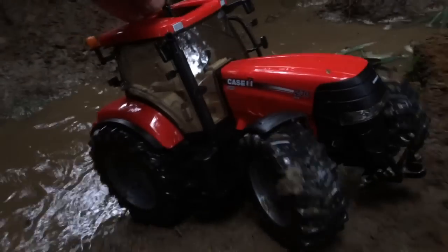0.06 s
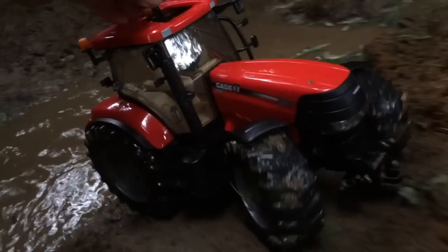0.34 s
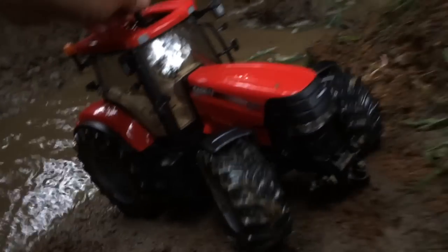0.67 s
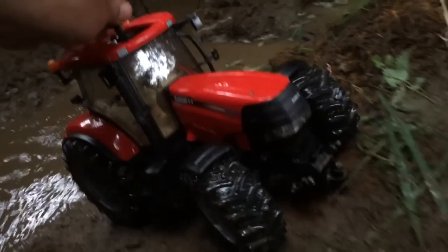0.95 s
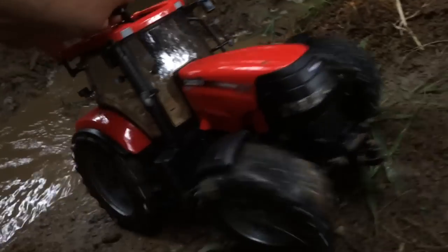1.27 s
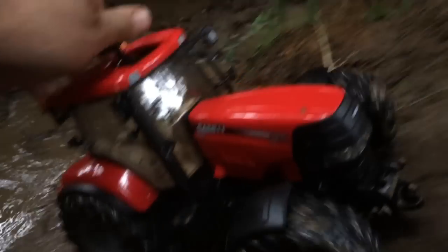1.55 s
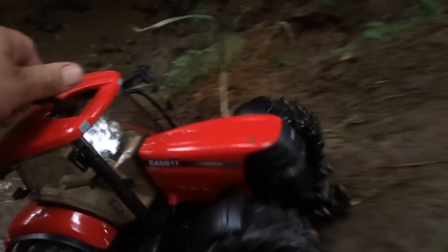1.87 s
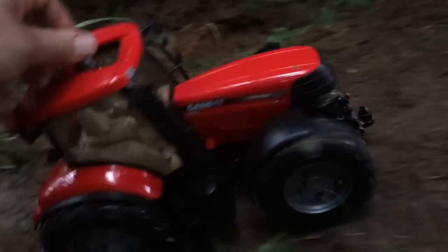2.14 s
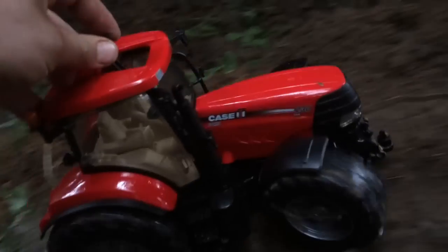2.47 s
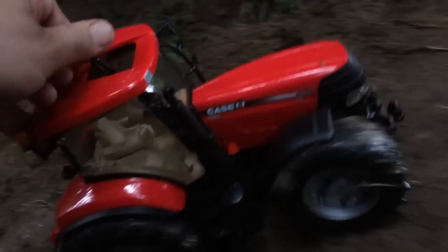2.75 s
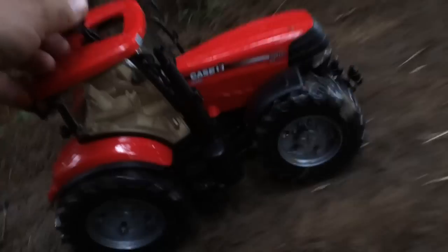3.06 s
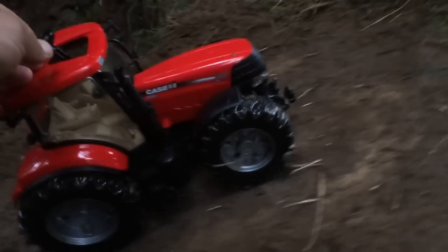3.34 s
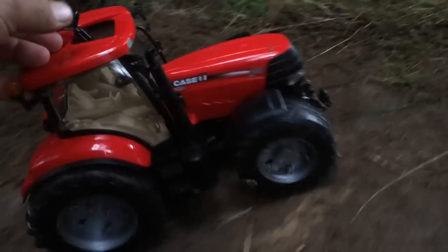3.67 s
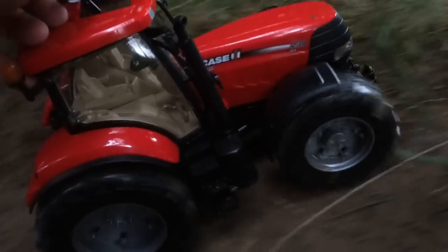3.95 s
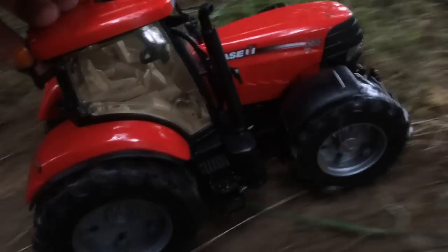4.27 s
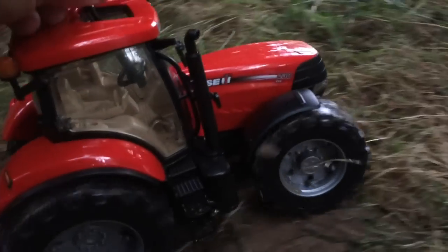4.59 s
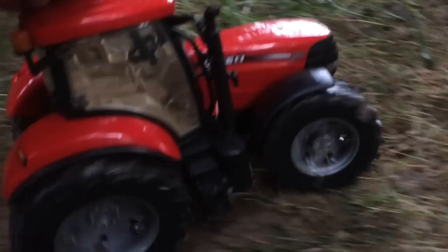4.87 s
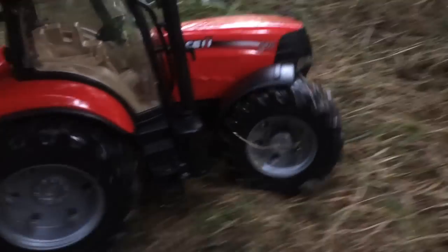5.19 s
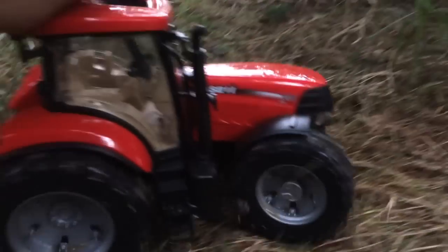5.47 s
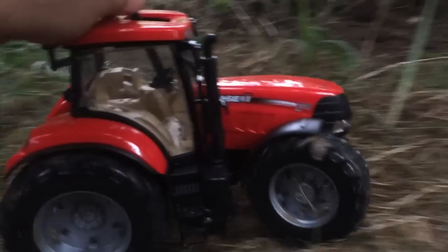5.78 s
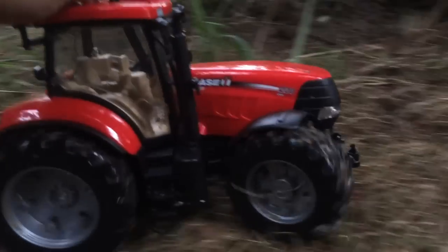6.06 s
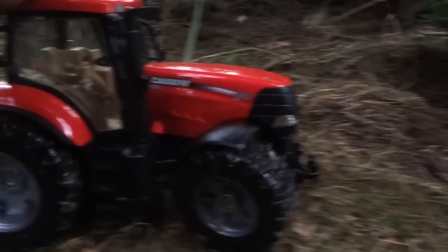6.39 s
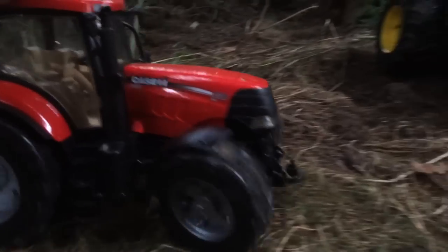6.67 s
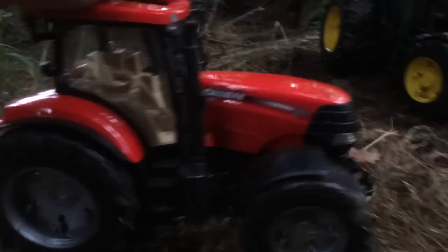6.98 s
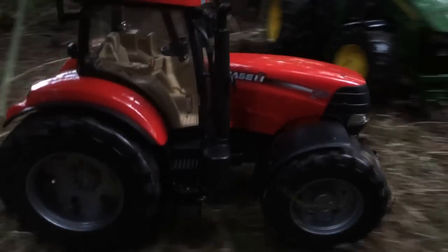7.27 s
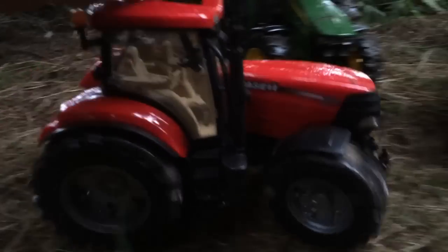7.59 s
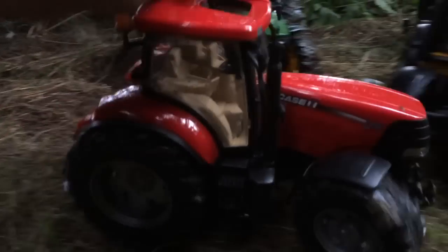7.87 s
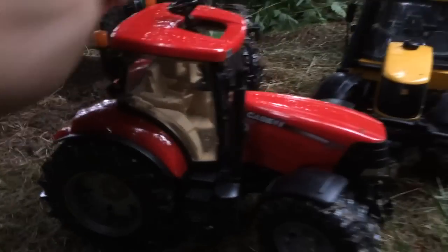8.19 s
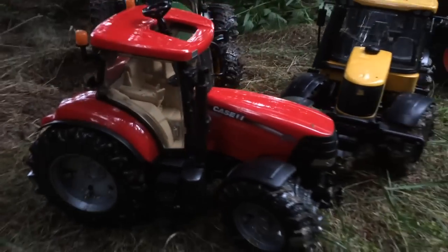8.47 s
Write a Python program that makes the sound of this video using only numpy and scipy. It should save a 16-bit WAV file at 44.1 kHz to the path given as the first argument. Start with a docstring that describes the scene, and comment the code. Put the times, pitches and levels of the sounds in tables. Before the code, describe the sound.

A plastic toy tractor is pushed by hand close to the microphone, over a steady low outdoor rumble. For the first 1.5 seconds wet mud crackles and squelches under its treads, with small watery drips and sharp snaps of grit around 1 to 1.3 seconds. From 1.5 seconds the hollow body rattles and loose axles knock unevenly as the wheels slip and grind. Dull rubbing near 3 seconds leads to a loud squelch and a soft thud at 3.4. Around 4 seconds comes a cluster of strong knocks, and the mud gives way to dry grass that rustles and ticks while the treads keep bumping. The rolling eases at about 6.6 seconds, and a tyre rubs with a faint thin whistle around 7. At 7.9 seconds one hard plastic clack and a few knocks mark the stop, then only faint ticks remain until about 8.7.

```python
"""Wet mud squelches and crackles under the treads of a plastic toy tractor, over a low outdoor rumble. Close
by, a hand pushes the toy out of a shallow stream, across the mud and onto dry grass. Tread lugs and other blows
knock and ring the hollow body, wheels slip and grind, grit snaps and a tyre rubs with a thin whistle. One hard
clack comes as the toy is parked."""
import sys
import numpy as np
from scipy import signal
from scipy.fft import rfft, irfft
from scipy.io import wavfile
from scipy.ndimage import uniform_filter1d

SR = 44100
rng = np.random.default_rng(int(sys.argv[2]) if len(sys.argv) > 2 else 0)


def to_wav(sig):
    """Store sig (one row per channel, or 1-D mono) as 16-bit WAV at the path in sys.argv[1].

    Samples outside -1..1 are clipped; the rate is SR.
    """
    pcm = np.clip(np.atleast_2d(sig), -1, 1) * 32767
    pcm = np.round(pcm).astype(np.int16)
    wavfile.write(sys.argv[1], SR, pcm.T)  # frames by channels


N = 384986
TIME_S = np.arange(N) / SR
TOP_HZ = 12500


def undb(db):
    """Decibels to gain."""
    return 10 ** (np.asarray(db) / 20)


def unit(x):
    """Scale to rms 1."""
    return x / np.sqrt(np.mean(x ** 2))


def unit_peak(x, samples=176):
    """Scale the loudest window to rms 1."""
    return x / np.sqrt(uniform_filter1d(x ** 2, samples, mode="constant").max())


def add(out, start_s, x):
    """Mix x in at start_s."""
    i = max(int(start_s * SR), 0)
    out[i:i + len(x)] += x[:max(N - i, 0)]


def butter(x, hz, kind, order=2):
    """Causal low-, high- or band-pass."""
    sos = signal.butter(order, np.clip(hz, 10, .45 * SR), kind, fs=SR, output="sos")
    return signal.sosfilt(sos, x)


def band(x, hz, ratio, order=1):
    """Band-pass from hz / ratio to hz * ratio."""
    return butter(x, [hz / ratio, hz * ratio], "band", order)


def colour(x, spectrum):
    """Filter by (freq_hz, gain_db) points; rms 1."""
    hz, db = np.transpose(spectrum)
    bins_hz = np.maximum(np.fft.rfftfreq(len(x), 1 / SR), 1)
    gain = undb(np.interp(np.log(bins_hz), np.log(hz), db))
    return unit(irfft(rfft(x) * gain, len(x)))


def walk(rate_hz):
    """Smooth random wander, rms 1."""
    hold = int(SR / rate_hz)
    steps = np.repeat(rng.standard_normal(N // hold + 1), hold)
    return unit(uniform_filter1d(steps, hold)[:N])


def swell(mid_s, half_width_s):
    """Bell-shaped envelope."""
    return np.exp(-.5 * ((TIME_S - mid_s) / half_width_s) ** 2)


def grains(per_s, spread_db):
    """Random tiny impacts, mostly small, a few large; rms 1."""
    size = undb(spread_db * np.minimum(rng.exponential(size=N), 5))
    return unit((rng.random(N) < per_s / SR) * size * rng.standard_normal(N))


def chatter(decay_s, first_hit=5.4, samples=1500):
    """A contact: one sharp hit, then dying rebounds."""
    force = rng.standard_normal(samples) * np.exp(-np.arange(samples) / SR / decay_s)
    force[0] += first_hit
    return force


def roll_db(time_s):
    """Base levels (rattle, crackle) as the hand pushes and pauses."""
    # time_s, rattle_db, crackle_db
    push_levels = [(0.0, -58.5, -54.5), (0.34, -59, -57), (0.9, -56, -51.5), (1.31, -57, -54.5),
                   (1.7, -52, -57.5), (1.87, -62.5, -58.5), (2.14, -53.5, -54), (2.33, -50.5, -54.5),
                   (2.92, -57, -55), (3.31, -52.5, -62), (3.45, -61.5, -60), (3.69, -58, -58),
                   (3.96, -47.5, -60), (4.52, -61, -58.5), (4.64, -60, -63), (6.1, -59, -61.5),
                   (6.59, -69, -71), (6.78, -64.5, -66.5), (7.03, -61, -60.5), (7.71, -58, -64.5),
                   (7.88, -50, -55.5), (8.09, -60, -64.5), (8.29, -80.5, -73.5), (8.73, -72, -74.5)]
    times_s, *levels_db = np.transpose(push_levels)
    return [np.interp(time_s, times_s, db) for db in levels_db]


def grass_share(time_s, start_s=3.53, fade_s=0.77):
    """0 on mud, 1 on dry grass."""
    return np.clip((time_s - start_s) / fade_s, 0, 1)


def ground(grains_per_s, spread_db, pops_per_s=60, pop_db=-11, flicker_db=3):
    """Mud fizzes and pops under the treads, then dry grass rustles and ticks."""
    # crush spectra: freq_hz, gain_db
    mud = [(710, -34), (1200, -4.5), (1540, -1), (2020, -4), (4340, -4), (5520, -3.5), (7590, -4),
           (9450, -5), (11500, -5), (13000, -17)]
    grass = [(880, -23.5), (1500, -1), (2110, -7), (2290, -10.5), (3150, -11.5), (4860, -9.5),
             (6600, -10.5), (10800, -10.5), (13000, -16.5)]
    fizz = np.zeros(N)
    for hz in 1200 * 2 ** (np.arange(8) / 2):  # each size of film or stalk has its own band
        bursts = grains(grains_per_s / 2, spread_db) * undb(flicker_db * walk(60))
        fizz += band(bursts, hz, 2 ** .25, order=2)
    pops = signal.oaconvolve(grains(pops_per_s, 1.1), chatter(.0007, first_hit=2))[:N]
    crush = unit(fizz) + undb(pop_db) * unit(pops)
    on_grass = grass_share(TIME_S)
    return np.sqrt(1 - on_grass) * colour(crush, mud) + np.sqrt(on_grass) * colour(crush, grass)


def body_ring(wall_db=2, wall_t60_s=0.056, samples=4000):
    """The hollow body struck once: modes weighted by strike point, plus the dense ring of thin walls."""
    # body modes: freq_hz, gain_db, t60_s
    body_modes = [(342, -1.5, 0.037), (454, -7, 0.068), (592.2, -3, 0.07), (697, -0.5, 0.031),
                  (857, 1, 0.026), (991, 5, 0.025), (1217, -15, 0.018), (1376, 0, 0.022),
                  (1635, -10, 0.018), (1842, -4, 0.042), (2000, -8.5, 0.03), (2390, -6.5, 0.048),
                  (2800, -14, 0.045), (3060, -6, 0.039), (3660, 3, 0.021), (4640, 6, 0.012),
                  (6060, -7.5, 0.023), (7330, -10.5, 0.051), (9300, -19.5, 0.016)]
    t = np.arange(samples) / SR
    hz, db, t60_s = np.transpose(body_modes)[:, :, None]
    detune, weight = rng.standard_normal((2, len(body_modes), 1))
    polarity = rng.choice([-1, 1], (len(body_modes), 1))
    decay = undb(db + 2 * weight - 60 * t / t60_s)
    modes = polarity * decay * np.sin(2 * np.pi * hz * (1 + 0.023 * detune) * t)
    walls = butter(rng.standard_normal(samples), 450, "high", order=3)
    walls = butter(walls, 4500, "low", order=1) * undb(-60 * t / wall_t60_s)
    return unit(modes.sum(0)) + undb(wall_db) * unit(walls)


def rattle(jolts_per_s, spread_db, parts=8, flicker_db=4.4):
    """Loose parts jolt the body, each coming and going."""
    out = np.zeros(N)
    for _ in range(parts):
        jolts = grains(jolts_per_s, spread_db) * undb(flicker_db * walk(35))
        out += signal.oaconvolve(jolts, body_ring())[:N]
    return unit(butter(out, 2100, "low"))


def rolling(rattle_db=-1.53, ground_db=1, scrub_db=-7, axle_db=-11, uneven_db=1.5):
    """The body rattles, axles rub, treads scrub and crush the ground."""
    lug_bite = undb(uneven_db * walk(28))
    shake, crush = undb(roll_db(TIME_S))
    scrub = unit(band(grains(5000, 2.2), 810, 1.9))
    axle = unit(band(grains(3300, 8.8), 2400, 1.06))
    body = undb(rattle_db) * rattle(160, 2.6) + undb(scrub_db) * scrub + undb(axle_db) * axle
    return shake * lug_bite * body + crush * undb(ground_db) * ground(9000, 0.97)


def outdoors(air_db=-66.5, bank_start_s=1.8, bank_fade_s=0.87):
    """Slowly swelling rumble, deeper by the stream than on the bank, and faint hiss."""
    # ambient spectra: freq_hz, gain_db
    stream_spectrum = [(20, -37), (40, -6), (70, 4), (120, -2.5), (200, -8), (400, -36), (900, -48)]
    bank_spectrum = [(20, -32), (40, -14.5), (70, -4), (130, 1.5), (200, -8), (400, -23), (900, -51.5)]
    air_spectrum = [(25, -19), (55, -4.5), (100, -3), (200, -15), (400, -16), (1000, -24), (2000, -27.5),
                    (3500, -33), (11000, -36.5), (13000, -43)]
    # rumble envelope: time_s, level_db
    rumble_levels = [(0, -60.5), (1.1, -60.5), (1.6, -56), (2.8, -60.5), (4.6, -62), (5.7, -59.5),
                     (6.6, -68.5), (7.3, -58.5), (8.1, -60.5), (8.7, -70)]
    stream = colour(rng.standard_normal(N), stream_spectrum)
    bank = colour(rng.standard_normal(N), bank_spectrum)
    air = colour(rng.standard_normal(N), air_spectrum)
    on_bank = np.clip((TIME_S - bank_start_s) / bank_fade_s, 0, 1)
    rumble = np.sqrt(1 - on_bank) * stream + np.sqrt(on_bank) * bank
    rumble_db = np.interp(TIME_S, *np.transpose(rumble_levels))
    return undb(rumble_db) * rumble + undb(air_db) * air


def knocks(blows, band_ratio=1.245, chatter_s=0.003, softening=0.087, crack_s=0.0047, tick_db=6):
    """Blows tick and ring the body near centre_hz; hard ones crack, softening lengthens dull ones."""
    tick_s, tick_hz, split_hz = 0.0053, 1800, 2900
    out = np.zeros(N)
    for start_s, level_db, centre_hz, treble_db in blows:
        contact = chatter(chatter_s * undb(-softening * treble_db))
        ring = signal.fftconvolve(contact, body_ring())
        t = np.arange(len(ring)) / SR
        tick = band(rng.standard_normal(len(t)) * np.exp(-t / tick_s), tick_hz, 2.16, order=2)
        hollow = butter(band(ring, centre_hz, band_ratio), 490, "high", order=3)
        hollow = unit_peak(hollow) + undb(tick_db + 0.69 * treble_db) * unit_peak(tick)
        hollow = butter(butter(hollow, split_hz, "low"), split_hz, "low")
        crack = butter(butter(ring, split_hz, "high"), split_hz, "high")
        crack *= .3 + np.exp(-t / crack_s)  # brightest at first touch
        add(out, start_s, undb(level_db) * (unit_peak(hollow) + undb(treble_db) * unit_peak(crack)))
    return out


def lug_knocks(lugs_per_s=12, mud_db=1.5, grass_db=9.5, count=104):
    """Tread lugs land unevenly, soft in mud, firm on grass; their level follows the rattle."""
    late, scatter_db, pitch, hardness = rng.standard_normal((count, 4)).T
    start_s = (np.arange(count) + .5 + .25 * late) / lugs_per_s
    level_db = roll_db(start_s)[0] + mud_db + (grass_db - mud_db) * grass_share(start_s) + scatter_db
    centre_hz = 825 * 2 ** (0.305 * pitch)
    treble_db = -17 + 5 * hardness
    return knocks(zip(start_s, level_db, centre_hz, treble_db))


def drops(glide=0.011, roughness=0.56):
    """Pockets of water and air ring briefly, rising as they close."""
    # drops and wet squeaks: start_s, pitch_hz, level_db, length_s
    pockets = [(0.069, 990, -46, 0.0051), (.287, 900, -49.5, .007), (0.413, 1000, -50, 0.0083),
               (0.487, 980, -46.5, .006), (1.255, 640, -44, 0.0062), (2.237, 4850, -38, 0.0064),
               (3.342, 3870, -42, 0.0065), (3.36, 1420, -40, 0.013), (3.502, 1606, -39, 0.0065),
               (3.658, 3380, -40.5, 0.0042)]
    out, t = np.zeros(N), np.arange(2500) / SR
    for start_s, pitch_hz, level_db, length_s in pockets:
        age = t / length_s
        rising_hz = pitch_hz * (1 + glide * np.tanh(age - 1))
        tone = np.sin(2 * np.pi * np.cumsum(rising_hz) / SR)
        spray = unit(band(rng.standard_normal(len(t)), pitch_hz, 1.44))
        drop = (tone + roughness * spray) * age * np.exp(-2 * age)
        add(out, start_s, undb(level_db) * unit_peak(drop))
    return out


def wheel_slips():
    """A slipping wheel shakes the body, tears the ground and squeezes resonant wet pockets."""
    # slips: mid_s, half_width_s, body_db, ground_db, squelch_db, squelch_hz
    slips = [(.09, 0.023, -78, -61, -49.5, 7300), (0.756, 0.027, -46.5, -39.5, -45.5, 1940),
             (1.027, 0.033, -52, -43, -42, 6240), (1.454, 0.025, -73, -52, -52.5, 3330),
             (1.534, 0.012, -39.5, -40, -38, 2960), (2.405, 0.023, -43, -69, -70, 1500),
             (2.787, 0.011, -40.5, -54, -41, 1490), (3.393, 0.0093, -32, -41.5, -29, 1940),
             (3.79, 0.054, -46.5, -53, -55, 980), (4.228, 0.014, -38, -56, -70, 1900),
             (4.449, 0.07, -49, -75, -72, 1900), (5.25, 0.017, -52, -68, -66, 790),
             (6.885, 0.0086, -51, -44.5, -44.5, 10500), (7.946, 0.01, -39.5, -57, -41, 1990),
             (8.216, 0.042, -50.5, -58.5, -66, 2300)]
    grind, tear, squeeze = rattle(1200, 5.3), ground(5000, 2.9), grains(5000, 1.0)
    out = np.zeros(N)
    for mid_s, half_width_s, body_db, ground_db, squelch_db, squelch_hz in slips:
        squelch = unit(band(squeeze, squelch_hz, 1.12))
        slip = undb(body_db) * grind + undb(ground_db) * tear + undb(squelch_db) * squelch
        out += swell(mid_s, half_width_s) * slip
    return out


def fine_grit(over_crackle_db=6.5, count=30):
    """Rows for grit_snaps: small snaps at random times, following the crackle level."""
    start_s = rng.random(count) * N / SR
    size, pitch = rng.standard_normal((count, 2)).T
    level_db = roll_db(start_s)[1] + over_crackle_db + 3 * size
    centre_hz = np.minimum(7440 * 2 ** (.4 * pitch), TOP_HZ)
    return zip(start_s, level_db, centre_hz)


def grit_snaps(gain_db=-1, burst_s=0.003, tail_db=-17, tail_s=0.012):
    """Grit and stalks snap under the treads: brittle bursts with a faint tail."""
    # loud snaps: start_s, relative_db, centre_hz
    loud_snaps = [(.5023, -36, 10000), (.9295, -38, 8000), (.9485, -36, 9500), (.9976, -30, 9000),
                  (1.016, -30, 9000), (1.214, -29, 2300), (1.2143, -33, 7000), (1.308, -29, 6500),
                  (1.532, -34, 4200), (2.6044, -38, 3340), (4.9626, -39, 7000), (4.963, -39, 2300),
                  (5.0865, -42, 2800), (5.1566, -45, 9400), (5.8395, -39, 2300), (6.376, -34, 5000),
                  (8.6853, -45, 2600)]
    out, t = np.zeros(N), np.arange(2000) / SR
    envelope = np.exp(-(t / burst_s) ** 2) + undb(tail_db) * np.exp(-t / tail_s)
    for start_s, relative_db, centre_hz in [*loud_snaps, *fine_grit()]:
        burst = band(rng.standard_normal(len(t)) * envelope, centre_hz, 1.3)
        burst = butter(burst, 1260, "high", order=3)
        add(out, start_s, undb(relative_db + gain_db) * unit_peak(burst))
    return out


def handling():
    """Dull rubbing as the toy is pushed."""
    # pushes: mid_s, half_width_s, centre_hz, level_db
    pushes = [(.755, 0.058, 169, -52), (3.06, 0.071, 234, -48.5), (3.164, 0.013, 240, -45.5),
              (3.28, 0.064, 211, -50)]
    out = np.zeros(N)
    for mid_s, half_width_s, centre_hz, level_db in pushes:
        rub = band(rng.standard_normal(N), centre_hz, 1.5, order=2) * swell(mid_s, half_width_s)
        out += undb(level_db) * unit_peak(rub, samples=700)
    return out


def further_knocks(gain_db=-8):
    """Further knocks on the hollow body, at set times."""
    # blows: start_s, relative_db, centre_hz, treble_db
    blows = [(1.519, -23.5, 1750, -3), (1.754, -33, 970, -9.5), (1.826, -28, 810, -11.5),
             (2.299, -18, 910, -18), (2.383, -25.5, 1230, -13), (2.607, -30, 1100, -1.5),
             (2.659, -31, 1040, -10), (2.775, -26, 617, -28), (2.834, -29, 947, -20),
             (3.299, -36, 920, -5.5), (3.922, -30, 1700, -31), (3.981, -32, 1060, -17),
             (4.043, -18.5, 1530, -10.5), (4.047, -16.5, 910, -15), (4.133, -23.5, 1060, -13.5),
             (4.184, -29, 1020, -15), (4.2, -24, 930, -13), (4.415, -23, 710, -12.5),
             (4.699, -35, 940, -14), (5.042, -33, 610, -17), (5.238, -27, 630, -42), (5.396, -37, 970, -28),
             (5.463, -33, 1050, -42), (5.787, -36.5, 860, -35), (5.561, -32, 820, -10.5),
             (5.838, -27.5, 610, -23), (5.984, -28, 735, -37), (6.094, -32.5, 820, -10.5),
             (6.377, -23.5, 1430, -6.5), (6.528, -44, 695, -24), (7.28, -30, 1350, -9),
             (7.523, -33.5, 600, -18), (7.722, -31, 596, -15.5), (7.901, -27.5, 813, -7),
             (7.952, -25, 1070, -17), (7.969, -24, 1480, -4), (7.973, -21.5, 590, -7),
             (8.018, -37.5, 1640, -8), (8.59, -48.5, 516, -19)]
    return undb(gain_db) * knocks(blows)


def chassis_thuds():
    """The chassis bumps down; soft soil damps it within a few cycles."""
    # bumps: start_s, pitch_hz, level_db, length_s
    bumps = [(3.383, 241, -36, 0.0073), (3.749, 101, -39.5, 0.014), (6.374, 340, -46.5, 0.0097),
             (7.867, 177, -38.5, 0.0027)]
    out, t = np.zeros(N), np.arange(4000) / SR
    for start_s, pitch_hz, level_db, length_s in bumps:
        age = t / length_s
        thud = np.sin(2 * np.pi * pitch_hz * t) * age * np.exp(-2 * age)
        add(out, start_s, undb(level_db) * unit_peak(thud, samples=700))
    return out


def tyre_whistle(pitch_hz=4950):
    """Rubber sliding on plastic excites one narrow, scratchy resonance."""
    # rubs: mid_s, half_width_s, level_db
    rubs = [(5.93, 0.033, -69), (7.14, .17, -68)]
    whistle = unit(band(grains(2800, 2.6), pitch_hz, 1.01))
    return whistle * sum(undb(db) * swell(mid_s, half_width_s) for mid_s, half_width_s, db in rubs)


def parking_clack(stop_hz=3450, stop_db=-19):
    """A stiff plastic part snaps against its stop, rings and shakes the body."""
    # contacts: start_s, level_db, centre_hz, treble_db
    contacts = [(7.859, -22, 1800, -8.5), (7.8613, -25.5, 1300, 8.5), (7.8656, -23, 1200, -18.5)]
    out = knocks(contacts, band_ratio=3.1, chatter_s=0.0031, softening=0, crack_s=0.0043, tick_db=-4)
    stop_ring = band(chatter(decay_s=.003), stop_hz, 1.2)
    add(out, contacts[1][0], undb(stop_db) * unit_peak(stop_ring))  # on the second contact
    return out


def scene():
    """The tractor in the open air, mono."""
    mix = rolling() + outdoors() + lug_knocks() + drops() + wheel_slips() + grit_snaps()
    mix += handling() + further_knocks() + chassis_thuds() + tyre_whistle() + parking_clack()
    return mix[None]


def record(dry):
    """Round off the treble and cut above TOP_HZ."""
    soft = butter(dry, 12200, "low", order=8)
    return signal.sosfilt(signal.ellip(8, .3, 75, TOP_HZ, fs=SR, output="sos"), soft)


dry = scene()
out = record(dry)
to_wav(out)
```